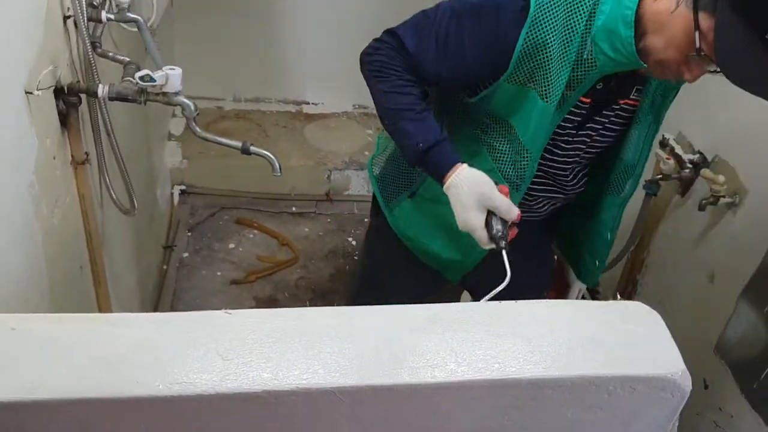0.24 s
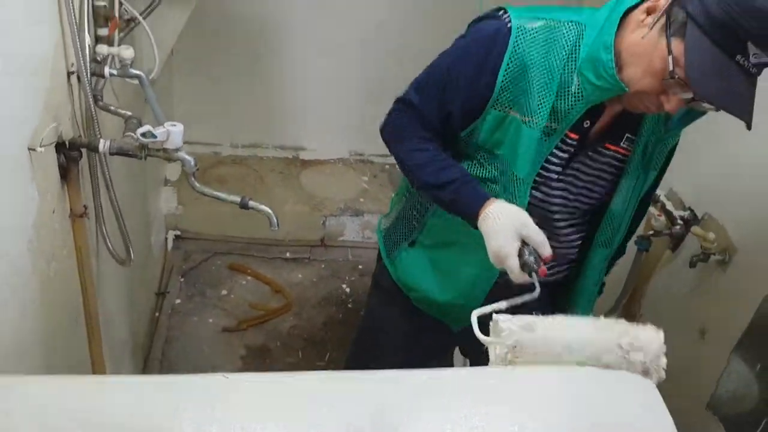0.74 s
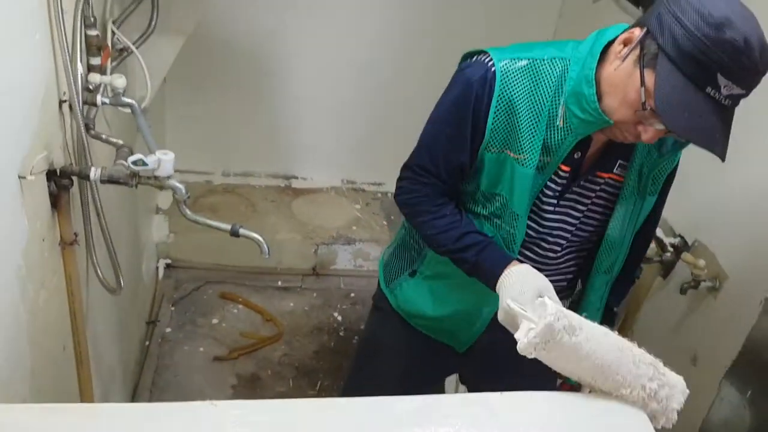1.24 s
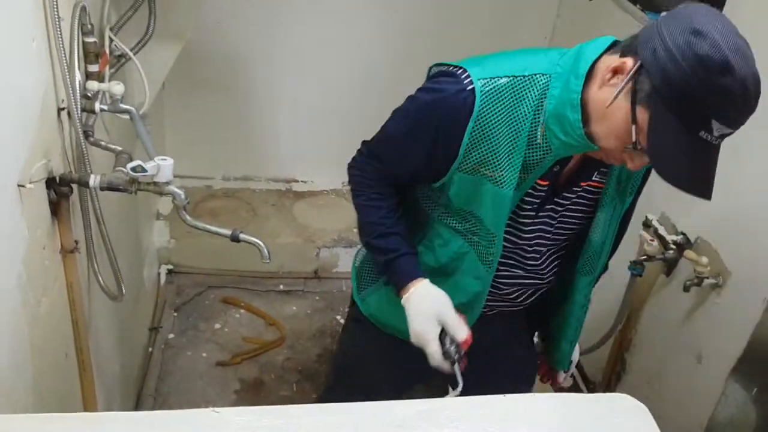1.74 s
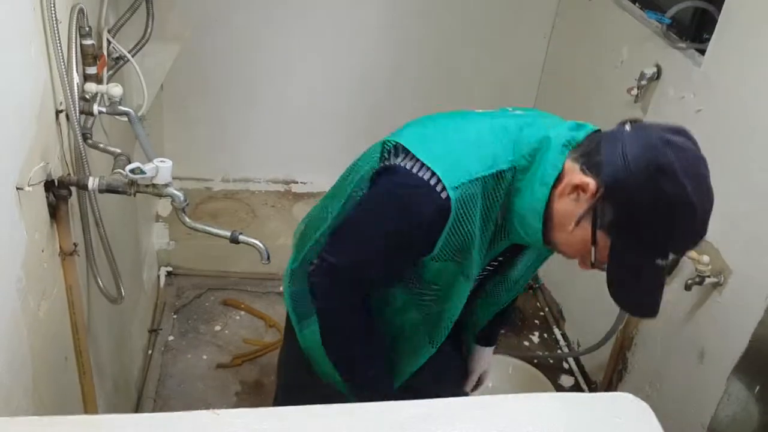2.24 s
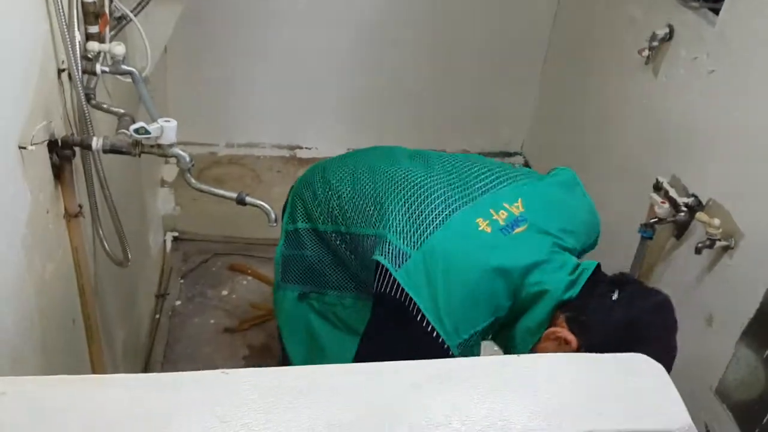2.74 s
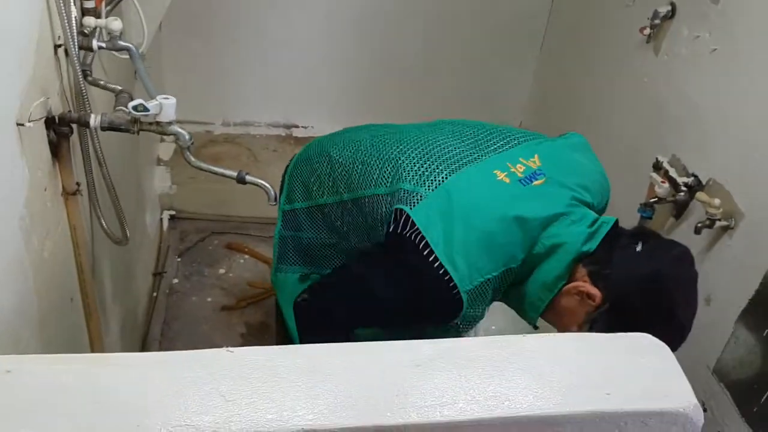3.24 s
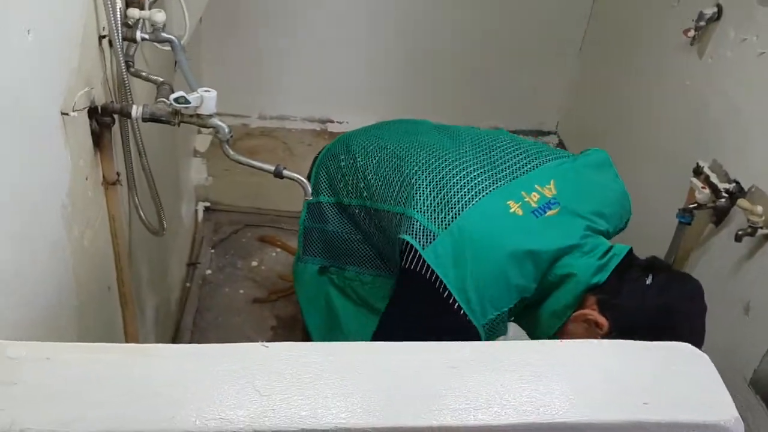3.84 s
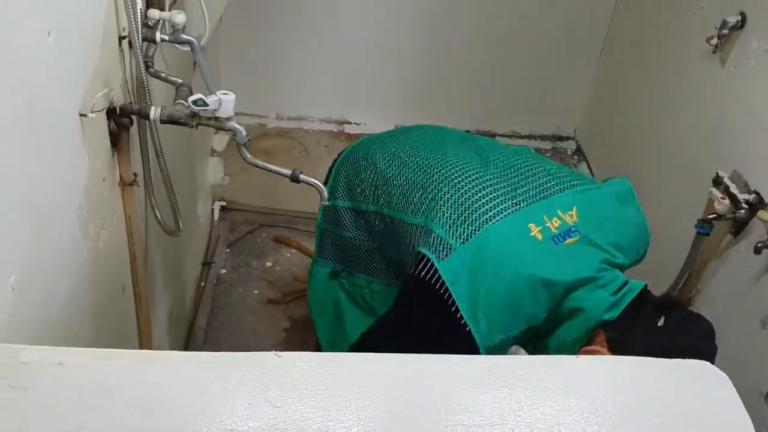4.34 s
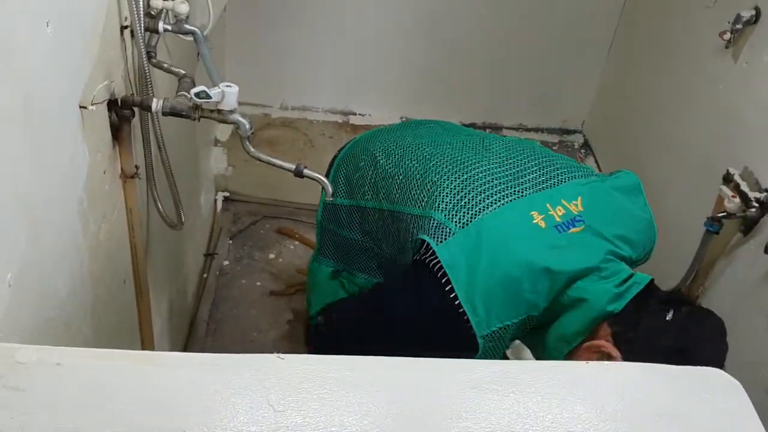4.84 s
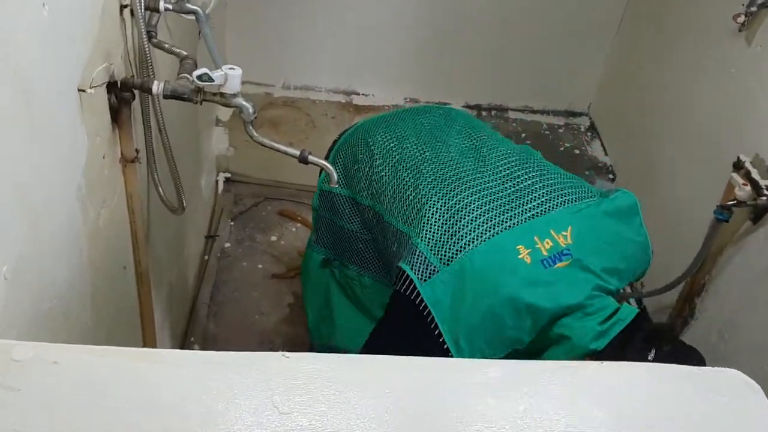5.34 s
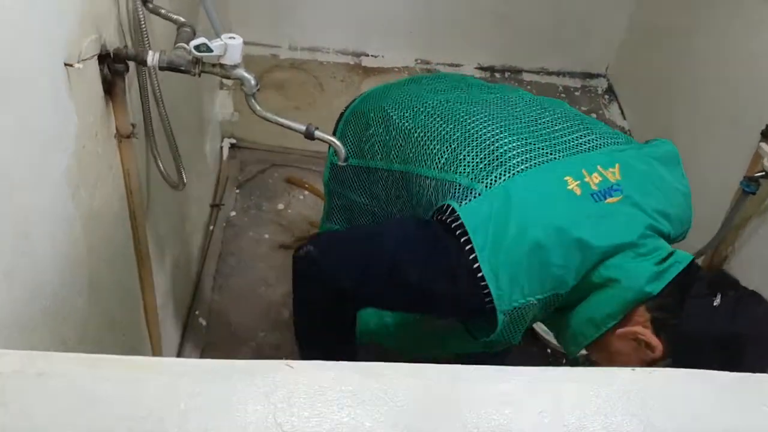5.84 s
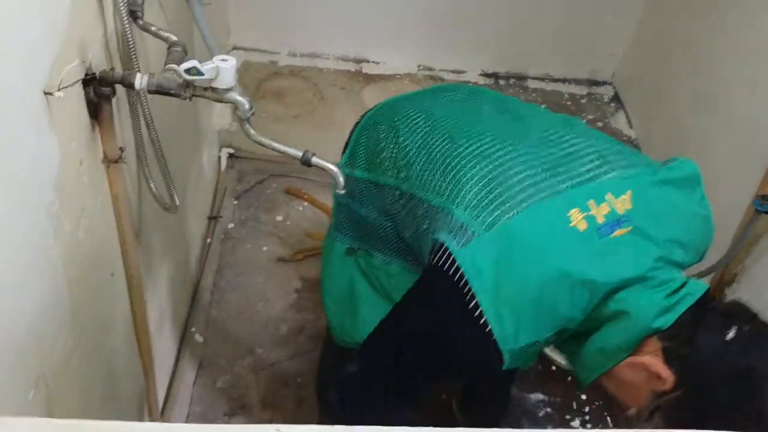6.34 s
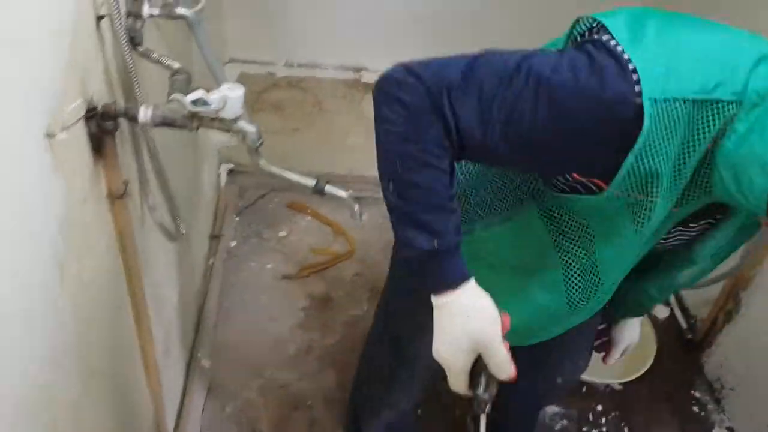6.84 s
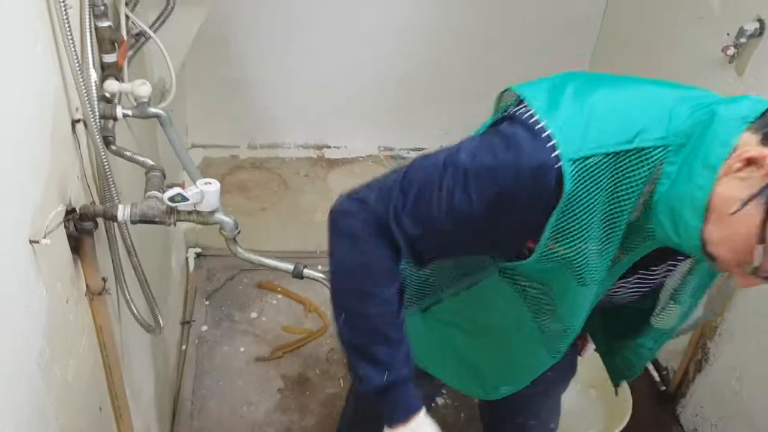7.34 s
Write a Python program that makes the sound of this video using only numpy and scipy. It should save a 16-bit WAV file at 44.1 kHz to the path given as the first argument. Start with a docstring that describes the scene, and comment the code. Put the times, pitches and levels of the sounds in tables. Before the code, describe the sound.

In a small bare washroom, a wet paint roller makes a sticky hissing stroke, nearly stops while a few tiny ticks sound, then rasps hard at about two seconds and keeps rolling back and forth. Its frame clacks lightly now and then. One dull low knock comes near the end. A motor hums steadily beneath. Close stereo microphone, with the roller partly hidden behind a panel.

```python
"""A wet paint roller works back and forth over a low partition in a small, bare washroom.
Its nap peels off the paint with a fine hiss of tiny random snaps; pressed harder, it rasps in coarser
clumps and rings the panel. It also drags at times, and single strands of paint tick.
The roller frame clacks now and then in bursts of filtered noise, and one dull knock, built from fading
sine waves, comes near the end. A motor hums throughout: wavering sine waves over a low rush of air."""
import sys
import numpy as np
from scipy import signal
from scipy.fft import rfft, irfft
from scipy.io import wavfile
from scipy.ndimage import uniform_filter1d

SR = 44100
rng = np.random.default_rng(int(sys.argv[2]) if len(sys.argv) > 2 else 0)


def output_pcm(signal):
    """Save a mono or channel-first signal as 16-bit PCM at the path in sys.argv[1].

    Samples are clipped to [-1, 1] before scaling.
    """
    pcm = np.clip(np.atleast_2d(signal).T, -1, 1) * 32767
    wavfile.write(sys.argv[1], SR, np.round(pcm).astype(np.int16))


N = 335592  # length of the sound in samples
T = np.arange(N) / SR  # time of each sample, s
HZ = np.fft.rfftfreq(N, 1 / SR)  # pitches in the whole sound's spectrum

# Strokes or fresh pushes of the arm; levels are before each sound's own overall gain:
# (start [s], speeding up [s], slowing down [s], hiss of the peeling nap [dB], rasp from pressure [dB])
STROKES = [(-0.25, 0.42, .25, -51.5, -52), (0.22, 0.17, .25, -55.5, -60.5), (0.67, .09, 0.14, -69.5, -68.5),
           (0.76, .13, 0.19, -64.5, -68.5), (0.98, 0.11, 0.26, -63, -64.5), (1.24, 0.17, .16, -66, -65),
           (1.38, 0.15, 0.26, -67, -53.5), (1.77, 0.076, 0.16, -55.5, -55), (1.95, 0.17, 0.1, -55, -47),
           (2.069, 0.12, 0.093, -51, -38.5), (2.08, 0.26, 0.29, -53.5, -55.5),
           (2.36, 0.25, 0.42, -54.5, -53.5), (2.81, 0.047, 0.12, -55, -56.5),
           (2.961, 0.1, 0.36, -54.5, -55.5), (3.049, 0.21, 0.17, -52.5, -55),
           (3.389, 0.15, 0.23, -50.5, -50.5), (3.65, 0.052, 0.14, -52, -55),
           (3.76, 0.31, .19, -53.5, -54.5), (4.215, .18, 0.29, -50, -50), (4.6, 0.2, 0.19, -57, -56.5),
           (4.8, 0.088, 0.2, -55.5, -57.5), (5.02, 0.23, 0.2, -49.5, -51), (5.44, 0.02, 0.12, -61, -52.5),
           (5.47, 0.17, 0.26, -50.5, -52.5), (5.81, 0.29, 0.14, -48, -50.5), (6.14, 0.04, 0.38, -59.5, -52),
           (6.21, 0.45, 0.61, -48, -50.5), (7.114, 0.1, 0.15, -51, -43), (7.25, 0.22, 0.2, -47.5, -50)]
# Spectrum of the dull rub, also used for the knock's echo: (pitch [Hz], relative level [dB])
RUB_SPECTRUM = [(100, -28.5), (220, -5.5), (320, -7), (400, -2), (520, -5.5), (700, -32), (1200, -20.5),
                (6000, -53)]


def gain_of(db):
    """Turns decibels into amplitude."""
    return 10 ** (np.asarray(db) / 20)


def evened(x):
    """Scales a signal to rms 1."""
    return x / np.sqrt(np.mean(x ** 2) + 1e-20)


def read(points, hz):
    """Reads a spectrum whose points are joined by straight lines over log frequency."""
    point_hz, value = np.transpose(points)
    return np.interp(np.log(hz + 1), np.log(point_hz + 1), value)


def add(mix, start_s, sound):
    """Mixes a sound in at start_s seconds."""
    part = mix[max(round(start_s * SR), 0):][:len(sound)]
    part += sound[:len(part)]


def drift(rate_hz):
    """Makes a slow random wander of rms 1 by keeping only the slow part of noise."""
    size = 4096
    hz = np.fft.rfftfreq(size, N / SR / size)
    noise = rfft(rng.standard_normal(size))
    slow = irfft(noise * np.exp(-(hz / rate_hz) ** 2))
    return np.interp(T, np.linspace(0, T[-1], size), evened(slow))


def grains(per_s, spread_db):
    """Makes tiny snaps of random moment, sign and size, scaled together to rms 1."""
    size_db = spread_db * np.minimum(rng.exponential(1, N), 4)
    size = gain_of(size_db) * rng.standard_normal(N)
    happens = rng.random(N) < per_s / SR
    return evened(size * happens)


def band(x, hz, width, order=2):
    """Filters for a steep, broad resonance; width is a share of its pitch."""
    edges = hz * np.array([1 - width / 2, 1 + width / 2])
    edges = np.clip(edges, 20, SR / 2 - 100)
    return signal.sosfilt(signal.butter(order, edges, "band", fs=SR, output="sos"), x)


def echoes(force, wet_db, near_s=0.0018, t60=0.27):
    """Spreads a force's energy over time: a burst of near reflections, then the tail of bare walls."""
    t = np.arange(SR // 2) / SR
    near = np.exp(-t / near_s)
    tail = gain_of(-60 * t / t60) ** 2  # squared: this is energy
    spread = near / near.sum() + gain_of(wet_db) ** 2 * tail / tail.sum()
    energy = signal.oaconvolve(force ** 2, spread / spread.sum())[:len(force)]
    return np.sqrt(abs(energy))


def room(force, wet_db):
    """The roller is hidden behind the panel, so each microphone gets its own diffuse mix of reflections."""
    return echoes(force, wet_db) * rng.standard_normal((2, N))


def through_panel(x, spectrum, size=8192):
    """Colours x with a spectrum and the panel's resonances, at equal power and with no sound ahead of time."""
    # Resonances of the panel and roller: (pitch [Hz], width [Hz], boost or cut [dB])
    resonances = [(637.5, 33, 1), (1186, 12, 2.5), (1677, 9.3, 5.5), (1778, 15, 4), (2034, 45, 1),
                  (2210, 54, 1), (2456, 30, 8), (2484, 45, -7), (2630, 14, -2.5), (3480, 110, 1),
                  (4390, 38, -4)]
    hz = np.fft.rfftfreq(size, 1 / SR)
    db = read(spectrum, hz)
    for centre, width, peak in resonances:
        db = db + peak / (1 + (2 * (hz - centre) / width) ** 2)
    # Folding the cepstrum forward makes the filter respond only after its input.
    cepstrum = irfft(np.log(evened(gain_of(db))))
    cepstrum[1:size // 2] *= 2
    cepstrum[size // 2 + 1:] = 0
    response = irfft(np.exp(rfft(cepstrum)))[None, :size // 2]
    return signal.oaconvolve(x, response, axes=1)[:, :N]


def microphones(spectra):
    """Turns two unrelated spectra into a pair that shares its bass."""
    # Likeness of the two microphones: (pitch [Hz], coherence [0 to 1])
    likeness = [(30, 0.86), (70, 1), (150, 0.76), (350, .88), (700, 0.52), (1300, 0.00028), (16000, 0)]
    same = np.clip(read(likeness, HZ), -1, 1)
    mid = spectra[0] * np.sqrt((1 + same) / 2)
    side = spectra[1] * np.sqrt((1 - same) / 2)
    return irfft(np.array([mid + side, mid - side]), N)


def stroke_db(peaks_db, law, turn_db):
    """Level that follows the roller's speed: each swing of the arm is a quarter sine up and one down."""
    power = gain_of(turn_db) ** 2  # what is left while the roller turns round
    for (start, rise, fall, _, _), peak_db in zip(STROKES, peaks_db):
        swing = np.interp(T - start, [0, rise, rise + fall], [0, 1, 0])
        speed = np.sin(np.pi / 2 * swing)
        power = power + (gain_of(peak_db) * speed ** law) ** 2  # law: how fast the sound grows with speed
    return 10 * np.log10(power)


def nap(level_db=5.5, flutter_db=1.47, fizz_hz=9800, brisk_db=-56, dulling=0.42):
    """Thousands of paint threads snap as the fibres lift off; slow rolling loses the top fizz."""
    # Spectrum of the nap's hiss: (pitch [Hz], relative level [dB])
    nap_spectrum = [(100, -16), (400, -22.5), (900, -7), (1500, -8.5), (2500, -6), (4200, 2), (5500, -.5),
                    (8000, 0.5), (9300, -.5), (10300, -2.5), (11800, -1.5), (13500, -3.5), (16000, -5.5)]
    peaks_db = [hiss_db for *_, hiss_db, _ in STROKES]
    speed_db = stroke_db(peaks_db, law=1.54, turn_db=-74)
    snaps = grains(per_s=21000, spread_db=-1.0) * gain_of(speed_db + flutter_db * drift(23))
    hiss = through_panel(room(snaps, wet_db=-9.0), nap_spectrum)
    fizz = signal.sosfiltfilt(signal.butter(6, fizz_hz, "high", fs=SR, output="sos"), hiss)
    # Below the brisk level, the fizz is turned down further than the rest.
    below_brisk_db = np.clip(uniform_filter1d(speed_db, size=16000) - brisk_db, -8, 0)
    return gain_of(level_db) * (hiss - fizz + fizz * gain_of(dulling * below_brisk_db))


def rasp(level_db=3.0, flutter_db=0.88):
    """Under pressure the roller sticks and slips in coarser clumps."""
    # Spectrum of the rasp: (pitch [Hz], relative level [dB])
    rasp_spectrum = [(100, -15), (350, -6.5), (550, -3.5), (800, -8), (1100, -6.5), (1500, -2.5), (1900, 1),
                     (2750, 3), (3000, -4), (3900, -2.5), (5200, -10.5), (8000, -19.5), (16000, -23)]
    peaks_db = [rasp_db for *_, rasp_db in STROKES]
    pressure_db = stroke_db(peaks_db, law=1.65, turn_db=-75)
    slips = grains(per_s=3200, spread_db=1.5) * gain_of(pressure_db + flutter_db * drift(24))
    return gain_of(level_db) * through_panel(room(slips, wet_db=-3.5), rasp_spectrum)


def motor(rumble_db=-51.5, waver_db=0.5, waver_hz=1.5, swell_db=0.6):
    """A motor's slightly wavering pure tones sound over the low rush of moving air."""
    # Steady tones of the motor: (pitch [Hz], rms level before wavering [dB])
    steady_tones = [(58.5, -50), (63.4, -64), (75, -65.5), (351, -66), (468, -80)]
    # The motor's fourth order swells in a standing wave of the room: (time [s], rms level [dB])
    whine_levels = [(0, -62.5), (2.4, -61), (4.6, -62.5), (6.1, -54.5), (7.6, -58)]
    # Spectrum of the moving air: (pitch [Hz], relative level [dB])
    air_spectrum = [(8, -6), (20, -23), (33, 1), (46, 1), (70, 4.5), (95, 3), (160, 1), (250, -1.5),
                    (360, 0.5), (450, -5), (600, -13), (900, -25.5), (1500, -38), (3000, -23.5),
                    (16000, -64)]
    whine_s, whine_db = np.transpose(whine_levels)
    whine_hz = 233.6
    tones = list(steady_tones) + [(whine_hz, np.interp(T, whine_s, whine_db))]
    clock = T + np.cumsum(0.00096 * drift(1.44)) / SR  # shared pitch waver
    hum = 0
    for hz, db in tones:
        loudness = np.sqrt(2) * gain_of(db + waver_db * drift(waver_hz))
        hum = hum + loudness * np.sin(2 * np.pi * (hz * clock + rng.random()))
    noise = rfft(rng.standard_normal((2, N)))
    air = evened(microphones(noise * gain_of(read(air_spectrum, HZ))))
    return hum + air * gain_of(rumble_db + swell_db * drift(5.6))


def skids():
    """Dragging instead of rolling scrapes the surface and shakes the panel's low resonances."""
    # Drags, with levels before the room and panel:
    # (middle [s], half length [s], hard scrape [dB], dull rub of the panel [dB])
    drags = [(0.125, 0.052, -59, -53), (2.187, 0.085, -51, -72), (2.207, 0.015, -39.5, -50),
             (2.84, 0.37, -70, -56), (3.168, 0.019, -53.5, -43.5), (4.422, 0.13, -59, -53),
             (5.18, 0.028, -57, -49), (5.32, 0.093, -67, -57), (5.72, 0.46, -74, -57),
             (6.557, 0.11, -69, -65), (7.224, 0.085, -56, -49)]
    # Spectrum of the hard scrape: (pitch [Hz], relative level [dB])
    scrape_spectrum = [(80, 2), (300, -11), (560, -16), (650, 9.5), (800, -5), (1300, 4.5), (2000, 0),
                       (4000, -39), (12000, -31)]
    scrape, rub = np.zeros(N), np.zeros(N)
    for middle, half, scrape_db, rub_db in drags:
        swell = np.exp(-((T - middle) / half) ** 2)
        scrape += gain_of(scrape_db) * swell
        rub += gain_of(rub_db) * swell
    slips = grains(per_s=5600, spread_db=-1.5)
    hard = through_panel(room(slips * scrape, wet_db=14), scrape_spectrum)
    dull = through_panel(room(slips * rub, wet_db=-16), RUB_SPECTRUM)
    return hard + dull


def clacks(width=0.5, upper_hz=3800, upper_width=0.26, level_db=1.5):
    """The sleeve chatters on its wire frame: quick clusters of small impacts ring two broad modes."""
    # Clacks of the roller frame: (time [s], level before level_db [dB], pitch of the lower mode [Hz],
    # brightness: upper mode against lower [dB], fading time of the chatter [s])
    clack_list = [(0.084, -37, 1680, -9, .011), (1.4844, -36.5, 2160, -22, .005),
                  (1.528, -36.5, 2240, -20, 0.018), (1.578, -40.5, 2170, 0, 0.011),
                  (2.058, -45, 2340, -14, 0.015), (2.2, -33, 2010, -22, 0.015),
                  (3.14, -41.5, 2100, -8, 0.017), (3.691, -40, 2540, -19, .022),
                  (3.845, -50, 2220, -6, 0.017), (4.5444, -42.5, 2740, 0.5, 0.014),
                  (4.645, -54, 1980, -3.5, 0.022), (4.79, -49, 1690, -22, 0.015),
                  (5.178, -42, 1700, -12, 0.016), (5.45, -45.5, 2200, 2, .014),
                  (5.765, -48.5, 1640, -18, 0.0068), (6.662, -38, 1700, -15, .0053),
                  (6.766, -43, 1750, -6, 0.015), (7.147, -45, 2600, 3, .006),
                  (7.2122, -40, 2750, 3.5, 0.034), (7.4903, -36.5, 2330, -3, 0.0034)]
    out, t = np.zeros((2, N)), np.arange(SR // 3) / SR
    for start, db, hz, bright_db, length in clack_list:
        chatter = np.exp(-t / length) * (1 - np.exp(-t / (0.058 * length)))
        loudness = gain_of(db + level_db) * echoes(chatter, wet_db=-2)
        contact_db = -5 + 0.44 * bright_db  # a brighter clack also hisses more at the contact
        for port, (impacts, hiss) in zip(out, rng.standard_normal((2, 2, len(t)))):
            lower = evened(band(impacts, hz, width, order=4))
            upper = gain_of(bright_db) * evened(band(impacts, upper_hz, upper_width))
            add(port, start, loudness * (lower + upper + gain_of(contact_db) * hiss))
    return out


def ticks(width=0.84, level_db=-3):
    """Single strands of tacky paint break, each with one dry tick of filtered noise."""
    # Breaking strands: (time [s], level before level_db [dB], pitch [Hz])
    strands = [(.8684, -45, 7200), (0.9157, -40.5, 5970), (1.0405, -38.5, 7160), (1.1174, -42, 7800),
               (1.139, -43, 6960), (1.1544, -48, 5500), (5.2989, -22.5, 2130)]
    out, t = np.zeros((2, N)), np.arange(SR // 8) / SR
    snap = echoes(np.exp(-t / 0.001), wet_db=-8, near_s=0.0004)
    for start, db, hz in strands:
        for port, crackle in zip(out, rng.standard_normal((2, len(t)))):
            add(port, start, gain_of(db + level_db) * snap * evened(band(crackle, hz, width)))
    return out


def knock(low_cut_hz=55):
    """A dull, heavy bump rings fading sine modes; its longer contact favours the low ones."""
    # Parts of the knock, hard edge first and then the full weight:
    # (time [s], level before the modes' own levels [dB], contact time [s], lowest pitch woken [Hz])
    contacts = [(6.6961, -27.5, 0.00081, 130), (6.7163, -25, 0.0053, 60)]
    # What the knock rings with: (pitch [Hz], relative level [dB], time to fade by 60 dB [s])
    thud_modes = [(83.6, -15, 0.2), (107.5, 5.5, 0.15), (126.5, -1.5, 0.24), (152, -19, 0.13),
                  (225, -12, 0.084), (283, -7.5, 0.175), (297, -13, 0.14), (562, -11, 0.069),
                  (830, -9, 0.052), (1190, -2, 0.032), (1440, -4, 0.025)]
    out, t = np.zeros(N), np.arange(SR // 2) / SR
    hz, mode_db, t60 = np.transpose(thud_modes)[:, :, None]
    for start, db, contact, lowest_hz in contacts:
        share = 1 / (1 + (hz * contact) ** 2) / (1 + (lowest_hz / hz) ** 4)
        fading = gain_of(mode_db - 60 * t / t60)
        ringing = (share * fading * np.sin(2 * np.pi * hz * t)).sum(0)
        add(out, start, -gain_of(db) * ringing * (1 - np.exp(-t / contact)))
    return signal.sosfilt(signal.butter(2, low_cut_hz, "high", fs=SR, output="sos"), out)


def scene(knock_room_db=-18):
    """Puts the roller and the knock in the room, over the motor."""
    bump = knock()
    bump_echo = gain_of(knock_room_db) * through_panel(room(bump, wet_db=11), RUB_SPECTRUM)
    roller = nap() + rasp() + skids() + clacks() + ticks()
    return microphones(rfft(roller + bump_echo)) + bump + motor()


def record(dry):
    """Gives each microphone port its own slight colour, then cuts the highest treble."""
    # Level of the first port against the second: (pitch [Hz], difference [dB])
    balance = [(100, 1.6), (350, -0.3), (750, 1.0), (1500, -4.0),
               (2800, 0.0), (5500, 2.0), (9500, -1.5), (14000, 1.5)]
    balance_db = read(balance, HZ)
    pair = irfft(rfft(dry) * gain_of(np.array([balance_db, -balance_db]) / 2), N)
    edge_hz = 15850
    treble_cut = signal.firwin(1023, edge_hz, window=("kaiser", 9), fs=SR)
    return signal.oaconvolve(pair, treble_cut[None], "same")


dry = scene()
out = record(dry)
output_pcm(out)
```